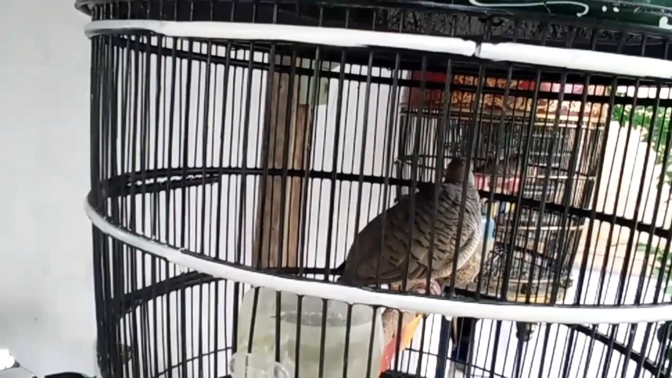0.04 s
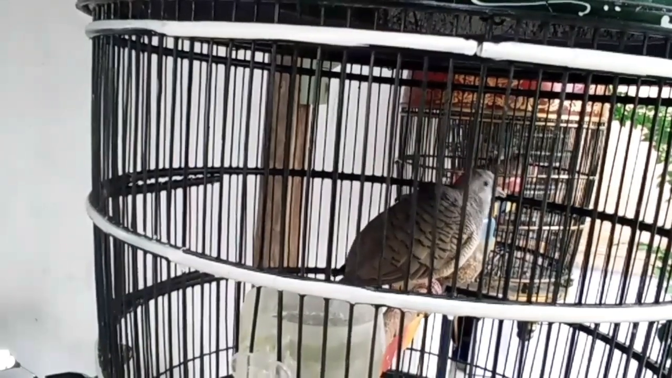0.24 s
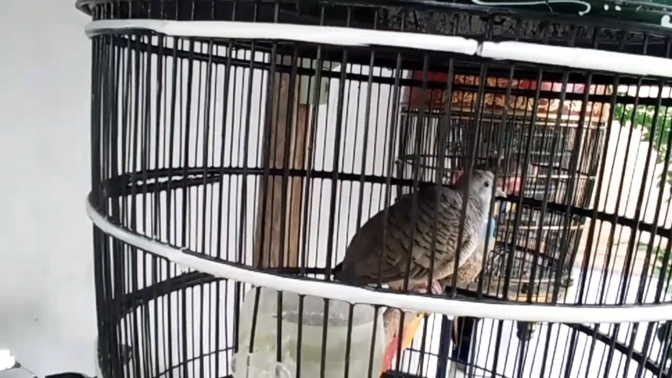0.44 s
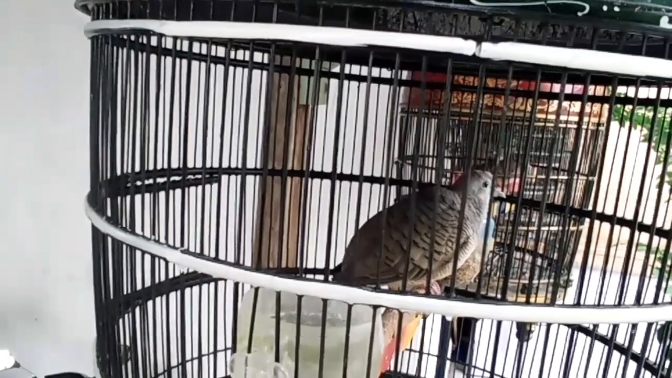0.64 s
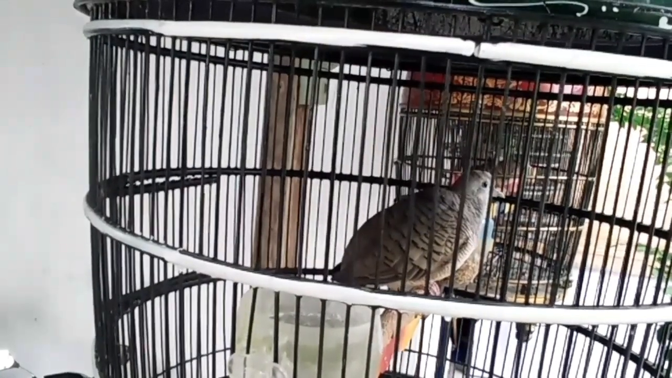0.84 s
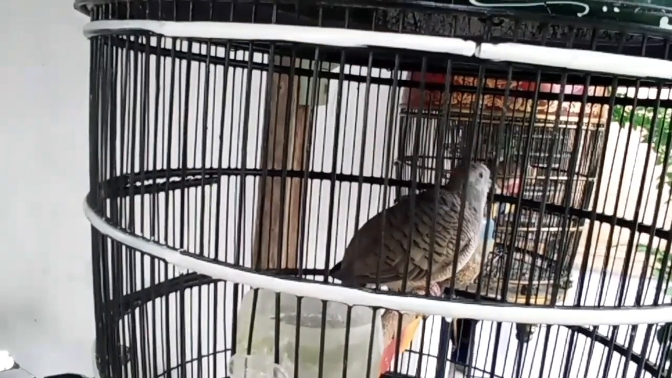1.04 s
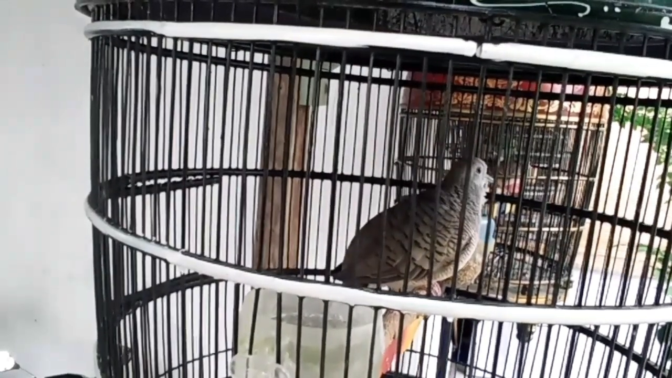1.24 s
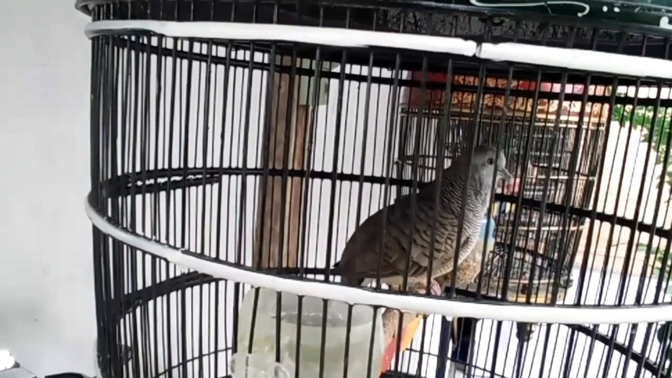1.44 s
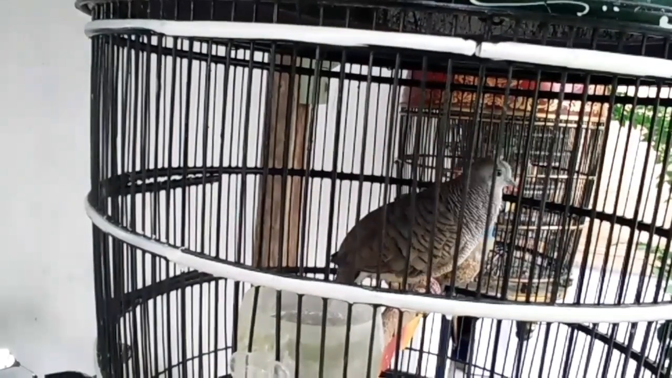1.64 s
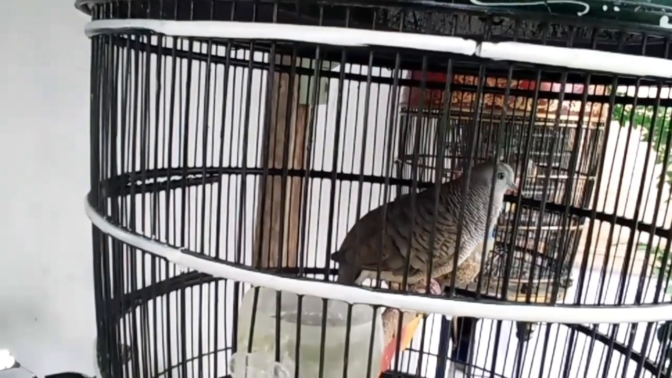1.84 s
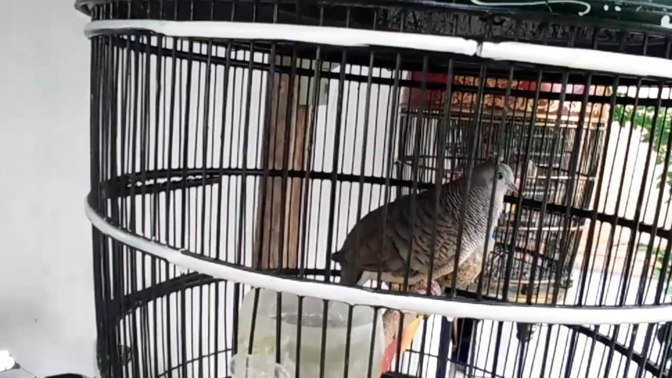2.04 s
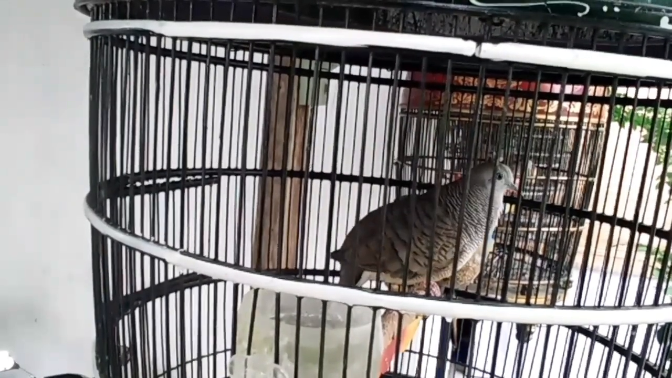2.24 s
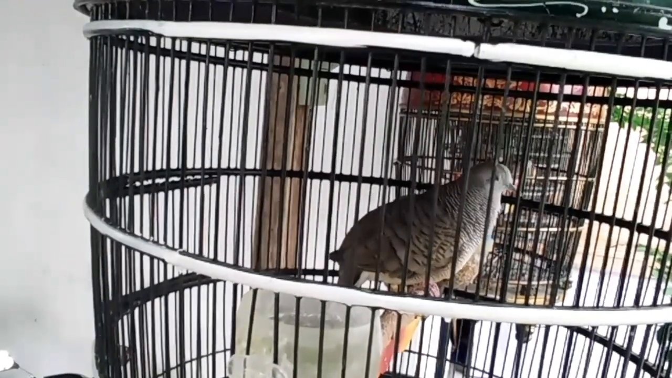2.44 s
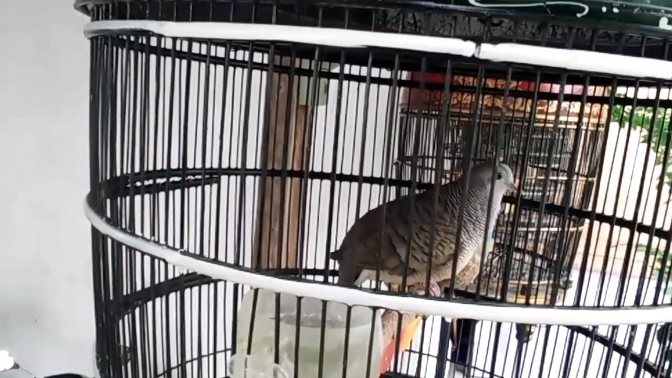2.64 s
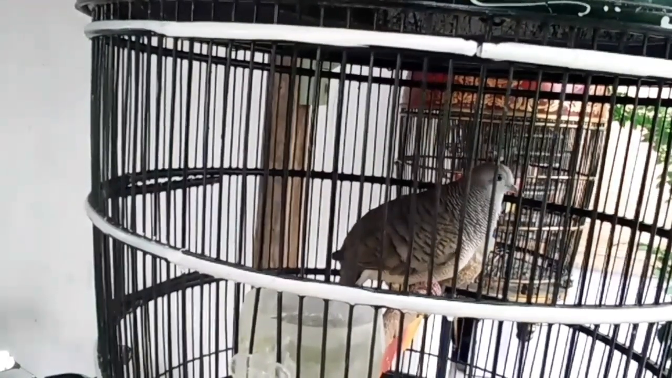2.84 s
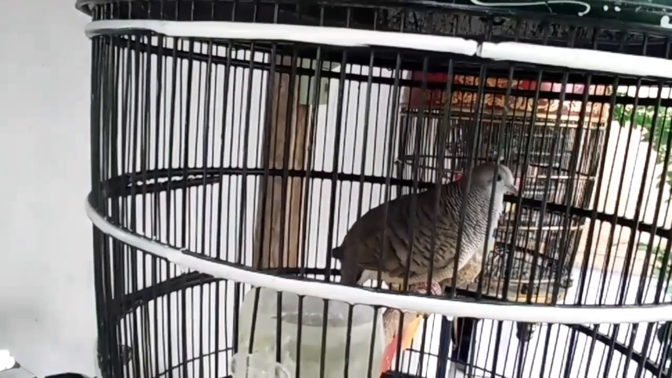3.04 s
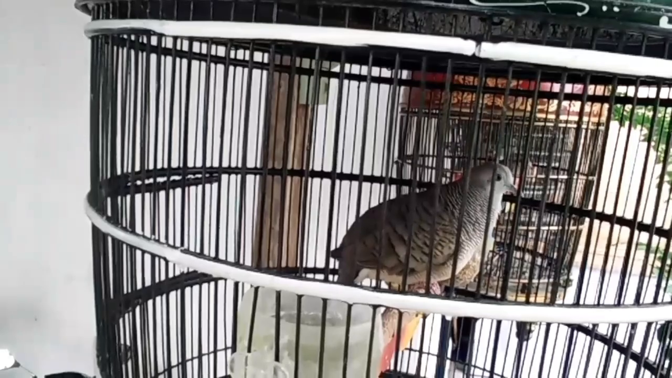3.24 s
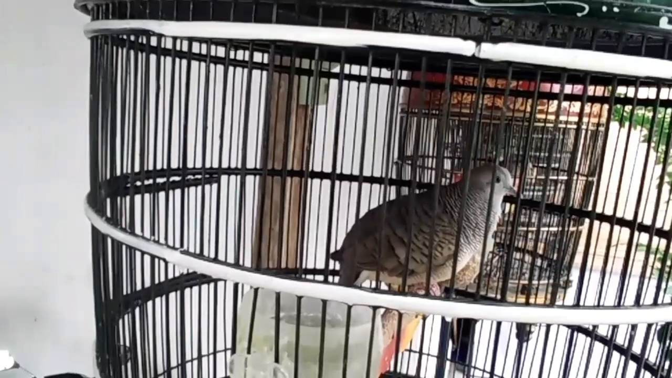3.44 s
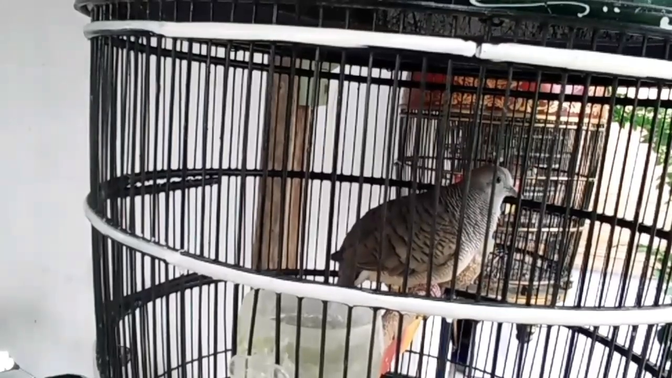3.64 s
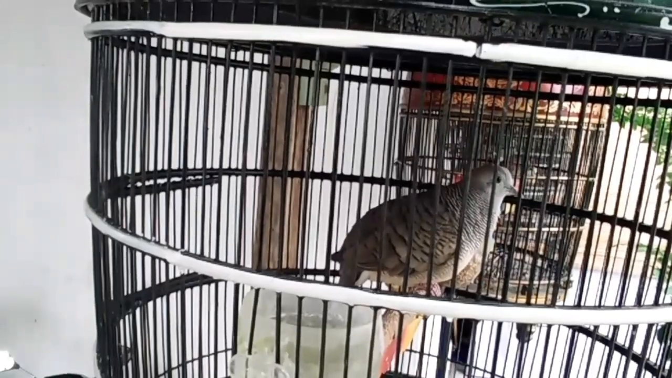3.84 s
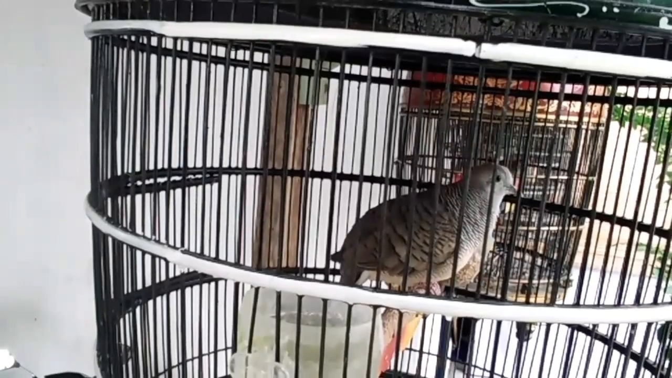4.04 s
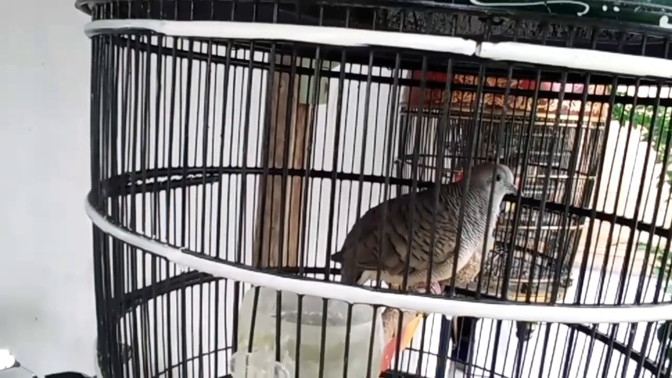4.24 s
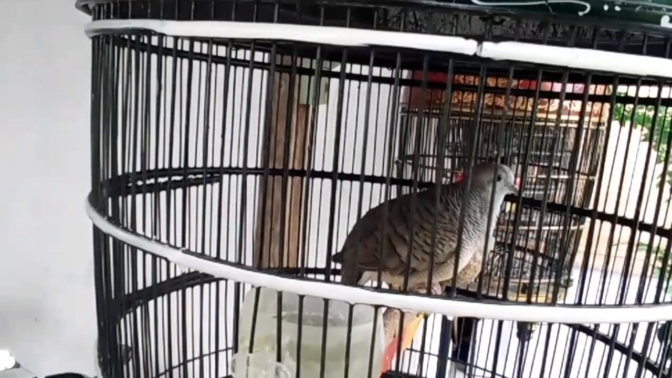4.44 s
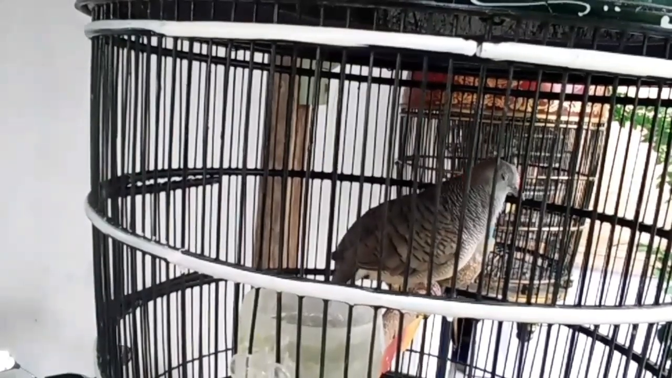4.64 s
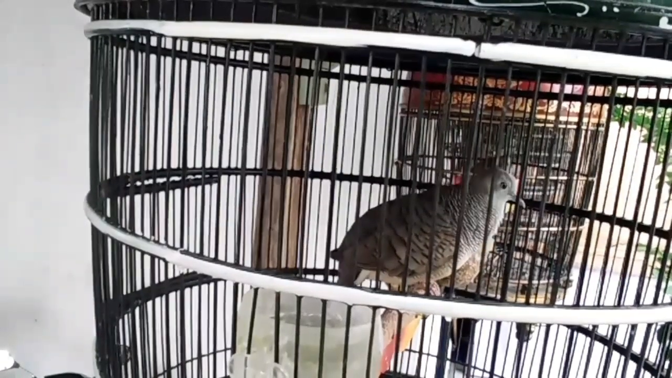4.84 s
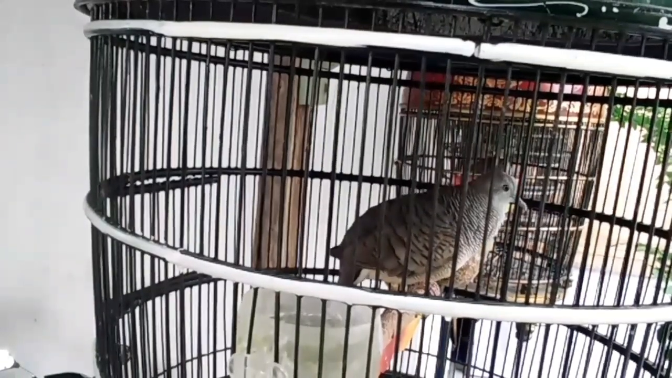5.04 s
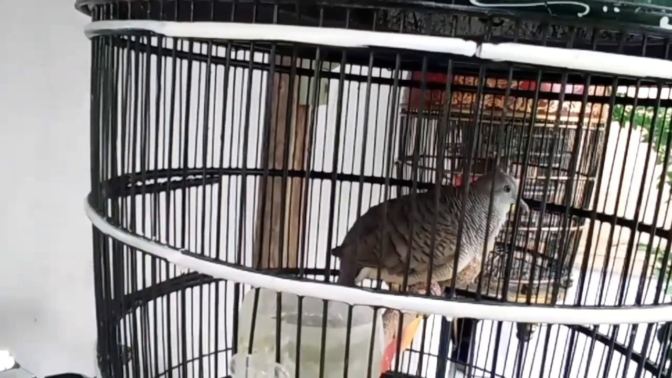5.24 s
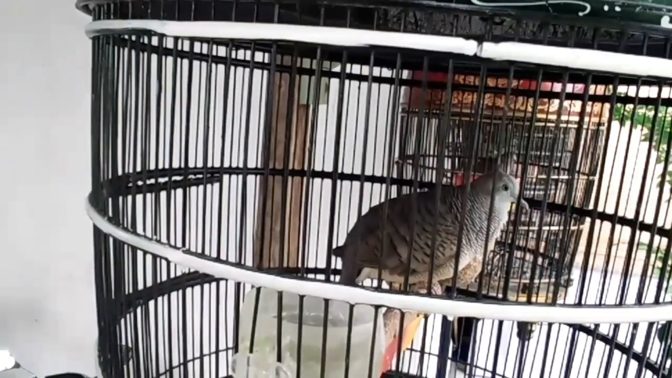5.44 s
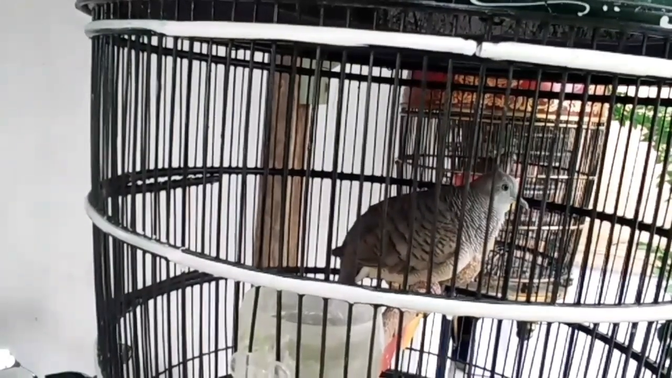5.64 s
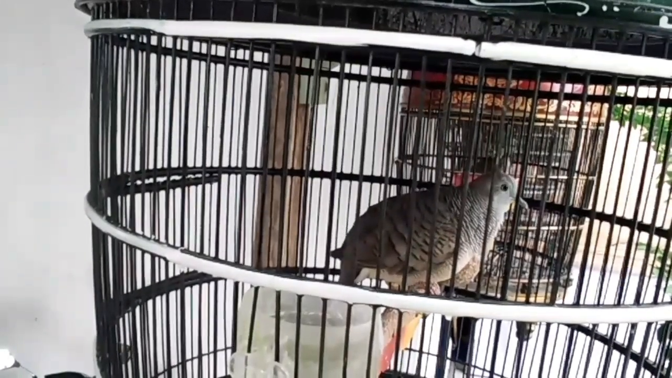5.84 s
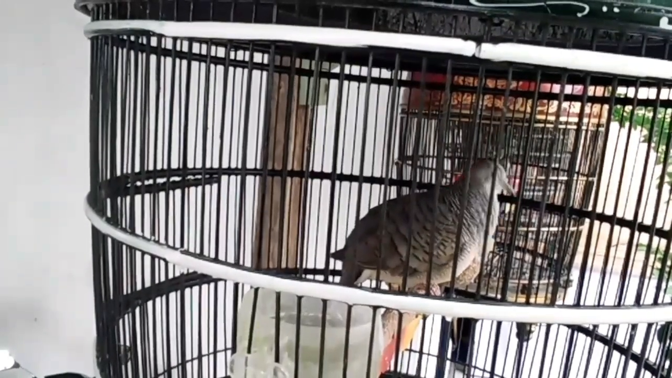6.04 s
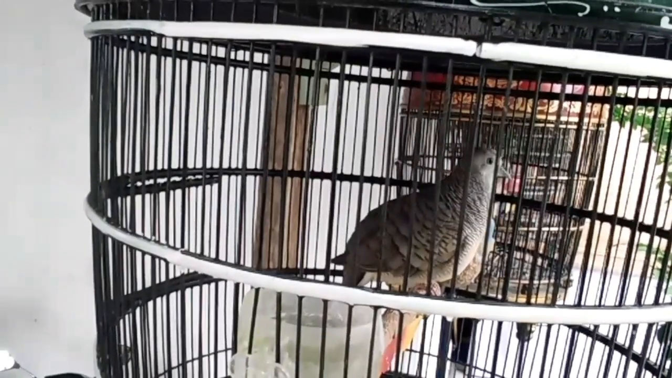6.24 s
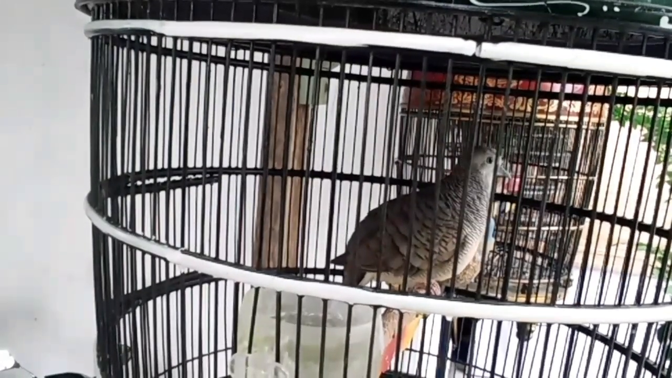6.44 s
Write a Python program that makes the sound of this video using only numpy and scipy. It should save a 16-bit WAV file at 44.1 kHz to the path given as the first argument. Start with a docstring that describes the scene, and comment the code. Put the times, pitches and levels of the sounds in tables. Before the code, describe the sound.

Close microphone on a caged dove, on an outdoor porch. Mellow, hollow, almost whistled coos start slightly hoarse, scoop upward, hold and sag. A first phrase of eleven coos slows into evenly spaced pulses; a second, shorter and slightly softer, follows after a gap. Behind are another dove's quieter, slightly higher repeated notes, reverberant far birds, a thin falling chirp and soft outdoor air.

```python
"""Zebra dove cooing on a porch

A caged zebra dove coos two phrases close by, on a porch whose walls throw each note back.
Every coo is a sum of harmonics that scoops up into the throat's resonance, holds and sags.
Another dove's even run, distant calls and a falling chirp are gliding tones, mostly reverberated;
dry swishes, a hush, a low rumble and the wash of the furthest birds are filtered noise.
"""
import sys
import numpy as np
from scipy import signal
from scipy.fft import rfft, irfft
from scipy.io import wavfile
from scipy.ndimage import uniform_filter1d

SR = 44100
rng = np.random.default_rng(int(sys.argv[2]) if len(sys.argv) > 2 else 0)


def wrap_up_sound(samples):
    """Save the sound to the file named by the first command line argument, as 16-bit audio."""
    columns = np.atleast_2d(samples).T
    # keep every value between -1 and 1, then stretch to whole-number steps
    tamed = np.clip(columns, -1, 1)
    steps = np.round(tamed * 32767).astype(np.int16)
    wavfile.write(sys.argv[1], SR, steps)


N = 286870

# The near dove's coos: (start [s], end [s], top pitch [Hz], drive level [dB], length of the upward scoop [s],
# sag of the level [dB], lift of the upper partials [dB])
NEAR_COOS = [(1.732, 1.799, 1208, -19, .05, -0.5, 3), (1.818, 1.854, 1169, -23.5, .014, -.5, 6.5),
             (1.941, 1.973, 1163, -22.5, 0.029, 6, 0), (2.058, 2.169, 1205, -20, .024, 3.5, 2),
             (2.305, 2.424, 1202, -20.5, 0.03, 4, 0.5), (2.563, 2.687, 1199, -22, .027, 2.5, -2),
             (2.835, 2.966, 1197, -21.5, .025, 3.5, -1.5), (3.124, 3.255, 1198, -22, .026, 2.5, -5),
             (3.413, 3.548, 1190, -23, 0.029, 2.5, -3), (4.844, 4.921, 1196, -21.5, .036, 0, -2.5),
             (4.926, 4.967, 1163, -26.5, .010, -2, 7), (5.051, 5.083, 1147, -23.5, 0.018, 2.5, 0.5),
             (5.163, 5.278, 1182, -25, .028, -1.5, 5), (5.419, 5.534, 1186, -25, 0.034, .5, -5.5)]
# Air rushing with the tone: (frequency [Hz], relative density [dB per Hz])
AIR_SPECTRUM = [(100, 2.5), (600, 0.5), (1700, -1), (2600, -8.5), (3300, -14.5), (4600, -19.5),
                (6500, -11.5), (9000, -8.5), (14000, -17.5)]


def dove(air_db=-53, uneven_db=3.0):
    """Turbulence: the near dove's coos carry an uneven trace of rushing air that follows their loudness."""
    coos = np.zeros(N)
    for row in NEAR_COOS:
        add(coos, *coo(*row))
    loudness = np.sqrt(abs(uniform_filter1d(coos ** 2, size=400)))
    unevenness = gain_of(air_db + uneven_db * wander(7.2))
    return coos + unevenness * loudness * noise(AIR_SPECTRUM)


# The scoop into a coo, with a break between a low and a high register:
# (share of the scoop [0-1], pitch as a share of the top [ratio], drive [dB])
SCOOP_SHAPE = [(0, .44, -32), (.25, .49, -19), (.5, .51, -16), (.62, .52, -22), (.68, .765, -15),
               (.82, .79, -7), (1, .82, -.5)]
# The held part: (share of the note [0-1], pitch as a share of the top [ratio], share of the level's sag [ratio])
HOLD_SHAPE = [(.05, .968, .7), (.17, .993, .45), (.32, 1, -.1), (.55, .999, -.05), (.68, .99, .5),
              (.81, .973, 1.3), (.93, .953, 1.1)]
# Resonance of the swollen throat: (frequency [Hz], gain [dB])
THROAT_RESONANCE = [(400, -30), (600, -22.5), (780, -12.5), (930, -3), (1200, 0.5), (1275, -3), (1380, -28),
                    (1800, -44), (2350, -52.5), (3000, -81), (3600, -81.5), (4750, -77), (5900, -59.5),
                    (7100, -53.5), (8300, -75.5), (10500, -77.5), (11900, -65), (13500, -78.5)]
FULL_ARCH_S = .11  # a coo shorter than this arches less in pitch


def coo(start, end, top_hz, db, scoop_s, sag_db, press_db, release_s=0.0072,
        end_pitch=0.9174, last_pitch=.84, jitter=0.0015, flicker_db=4):
    """Source and filter: as the syrinx glides up, the throat passes its second harmonic, then its fundamental."""
    t = np.arange(start - scoop_s, end + release_s, 1 / SR)
    early, early_pitch, early_db = np.transpose(SCOOP_SHAPE)
    late, late_pitch, sag = np.transpose(HOLD_SHAPE)
    scoop_times = start + (early - 1) * scoop_s
    hold_times = start + late * (end - start)
    knots = np.sort(np.r_[scoop_times, hold_times, end, end + release_s])

    arch = min((end - start) / FULL_ARCH_S, 1)
    held_pitch = 1 - (1 - np.r_[late_pitch, end_pitch]) * arch
    pitch = np.interp(t, knots, np.r_[early_pitch, held_pitch, last_pitch])
    if scoop_s < .017:
        pitch = np.maximum(pitch, .88)  # a coo slurred onto the last one stays in the high register
    shake, flicker = rng.standard_normal((2, SR))
    unsteadiness = 1 + jitter * evened(uniform_filter1d(shake, size=90))[:len(t)]
    hz = top_hz * uniform_filter1d(pitch, size=90) * unsteadiness
    phase = 2 * np.pi * np.cumsum(hz) / SR

    drive_db = np.interp(t, knots, np.r_[early_db, -sag * sag_db, -sag_db - 3.5, -36])
    drive = gain_of(db + uniform_filter1d(drive_db, size=90)) * signal.windows.tukey(len(t), .04)
    partials = [gain_of(read(THROAT_RESONANCE, k * hz)) * np.cos(k * phase) for k in range(1, 12)]

    # the faint upper partials flicker with how firmly the membranes close, and weaken outside the held part
    firmness = gain_of(press_db + flicker_db * evened(uniform_filter1d(flicker, size=1500))[:len(t)])
    firmness = firmness * np.clip(np.minimum(t - start, end - t) / 0.009 + 0.35, .2, 1)
    return t[0], np.sqrt(2) * drive * (sum(partials[:2]) + firmness * sum(partials[2:]))


# The hoarse start of a coo: (frequency [Hz], relative density [dB per Hz])
RASP_SPECTRUM = [(300, -21), (600, 1), (1400, 2.5), (2000, -12.5), (3000, -32), (8000, -42.5)]


def rasp(rasp_db=-35):
    """Amplitude-shaped noise: each coo starts hoarse, until the scoop settles into the clear tone."""
    swell = np.zeros(N)
    for start, _, _, db, scoop_s, _, _ in NEAR_COOS:
        window = signal.windows.tukey(round(scoop_s * SR), .5)
        add(swell, start - scoop_s, gain_of(db + rasp_db) * window)
    return swell * noise(RASP_SPECTRUM)


# Wall echoes: (delay [s], level before the porch's colouring [dB])
WALL_ECHOES = [(0.0131, -17.5), (0.0285, -19), (.0365, -16.5), (.052, -18.5)]
# Colour of the returned sound, which booms just under the coos' pitch: (frequency [Hz], gain [dB])
PORCH_RESONANCE = [(400, 1), (700, 0.5), (830, 2.5), (915, 15.5), (955, 9.5), (1020, -3), (1200, 2.5),
                   (1400, 2.5), (1800, 7.5), (3000, -1.5), (8000, 4.5)]


def porch(x, wet_db=-19):
    """Early reflection: wall echoes and a short diffuse tail, in the porch's colour, join the direct sound."""
    thrown = gain_of(wet_db) * reverb(x, stretch=0.92, build_s=0.038)
    for delay, db in WALL_ECHOES:
        add(thrown, delay, gain_of(db) * x)
    return x + coloured(thrown, PORCH_RESONANCE)


def neighbour(wet_db=-8, overtones_db=-1, bend=.01):
    """Directivity: a second dove a few cages away is turned aside, so its overtones arrive mainly as echo."""
    leans = rng.standard_normal(20)
    notes = [sliding([note], bend * lean)[0] for note, lean in zip(neighbour_run(), leans)]
    tone = whistles(notes, arch=.05, waver=.012, flutter_db=2, second_db=-27, third_db=-25)
    low = coloured(tone, [(1700, 0), (2100, -40)])  # keeps the fundamental
    grainy = (tone - low) * evened(1 + wander(130))
    overtones = reverb(grainy, stretch=2.6, build_s=.003) * evened(gain_of(2 * wander(6)))
    echo = gain_of(wet_db) * reverb(low, stretch=1.7, build_s=0.0079)
    return low + echo + gain_of(overtones_db) * overtones


# The run swells and fades while its pitch sinks: (time [s], pitch [Hz], level before echo [dB])
RUN_CONTOUR = [(3.79, 1361, -52), (4.0, 1311, -52.5), (4.3, 1317, -46.5), (5.07, 1314, -49.5),
               (5.75, 1256, -58)]
RUN_START_S, RUN_NOTE_S, RUN_PACE_S = 3.79, .095, .228
RUN_HURRY_S, RUN_SETTLE_NOTES = .04, 2.1  # shortening of the first gap; notes over which it dies away


def neighbour_run(count=10):
    """Exponential relaxation: even notes (start, length, pitch, level) start hurried and settle to their pace."""
    gaps = RUN_PACE_S - RUN_HURRY_S * np.exp(-np.arange(count - 1) / RUN_SETTLE_NOTES)
    starts = RUN_START_S + np.r_[0, np.cumsum(gaps)]
    s, hz, db = np.transpose(RUN_CONTOUR)
    return [(at, RUN_NOTE_S, np.interp(at, s, hz), np.interp(at, s, db)) for at in starts]


# Doves across the yard: (start [s], length [s], mid pitch [Hz], level before distance [dB])
YARD_COOS = [(0, 0.078, 990, -57.5), (.12, 0.14, 1007, -68), (1.025, 0.087, 1021, -45.5),
             (1.08, 0.092, 1270, -49), (1.2, 0.1, 1153, -45.5), (1.23, .24, 1075, -47.5),
             (1.47, 0.32, 1123, -50), (3.62, 0.231, 1210, -63.5), (4.56, .1, 1169, -55.5),
             (4.765, 0.042, 1134, -49), (5.66, .11, 1029, -53.5), (5.98, .08, 1155, -51.5),
             (6.06, 0.085, 1196, -51), (6.345, 0.088, 1085, -45.5), (6.39, 0.098, 1183, -49)]
# Hoarse, higher calls of other cage birds: (start [s], length [s], mid pitch [Hz], level before distance [dB])
YARD_CALLS = [(1.05, 0.084, 1850, -62.5), (1.14, 0.2, 1716, -61), (1.37, 0.14, 1690, -59),
              (1.38, 0.11, 2074, -68), (1.55, .6, 1675, -59), (2.22, 0.11, 2160, -61),
              (2.92, 0.097, 2128, -66.5), (3.19, .09, 3700, -70.5), (3.76, 0.1, 1736, -65.5),
              (5.54, .1, 1790, -66), (6.22, .2, 1900, -66), (6.38, .1, 1650, -65.5)]
# Soft, low hoots from much further off: (start [s], length [s], mid pitch [Hz], level before distance [dB])
DISTANT_HOOTS = [(.91, 0.089, 649, -75), (1.0, .2, 380, -81), (1.55, 0.12, 398.3, -76),
                 (2.72, 0.21, 397, -78), (4.16, 0.18, 444, -79), (5.69, 0.17, 713, -74)]
COO_SLIDE, CALL_SLIDE = 0.044, -0.038  # change of pitch over a far note, as a share


def far_birds(direct_db=-11, wet_db=-2, hoarse_db=-4):
    """Direct-to-reverberant ratio: distant calls, some hoarse, arrive mostly as reverberation."""
    calls = YARD_CALLS + stray_notes(low_hz=1900, high_hz=3770, db=-82, length_s=.1, count=6)
    coos = whistles(sliding(YARD_COOS, COO_SLIDE), arch=.05, waver=.024,
                    flutter_db=2.5, second_db=-42, third_db=-54)
    cries = whistles(sliding(calls, CALL_SLIDE), arch=.03, waver=.025,
                     flutter_db=3, second_db=-42, third_db=-54)
    hoots = whistles(sliding(DISTANT_HOOTS, COO_SLIDE), arch=.07, waver=.06,
                     flutter_db=3, second_db=-42, third_db=-54)
    hoarseness = evened(1 + gain_of(hoarse_db) * wander(220))
    dry = coos + hoots + cries * hoarseness
    return gain_of(direct_db) * dry + gain_of(wet_db) * reverb(dry, stretch=0.94, build_s=0.019)


def stray_notes(low_hz, high_hz, db, length_s, count):
    """Stratified chance: one faint note at random in each equal slice of the scene, pitched on a log scale."""
    slice_s = N / SR / count
    return [((k + when) * slice_s, length_s * (.5 + long), low_hz * (high_hz / low_hz) ** high, db)
            for k, (when, long, high) in enumerate(rng.random((count, 3)))]


# A small bird's falling chirp: (time [s], pitch [Hz], level before distance [dB])
CHIRP_CONTOUR = [(1.58, 6750, -74), (1.6, 6530, -61.5), (1.625, 5350, -71.5), (1.67, 5020, -59),
                 (1.731, 4270, -71)]


def chirp(waver=.025, direct_db=-10, wet_db=0):
    """Frequency modulation and reverberation: one thin note slides down and lingers in the yard."""
    s, hz, db = np.transpose(CHIRP_CONTOUR)
    t, dry = np.arange(s[0], s[-1], 1 / SR), np.zeros(N)
    pitch = np.interp(t, s, hz) * (1 + waver * wander(300)[:len(t)])
    tone = np.sin(2 * np.pi * np.cumsum(pitch) / SR)
    add(dry, s[0], gain_of(np.interp(t, s, db)) * signal.windows.tukey(len(t), .1) * tone)
    return gain_of(direct_db) * dry + gain_of(wet_db) * reverb(dry, stretch=3.5, build_s=.006)


# Dry strokes, like brushed feathers: (start [s], rise [s], hold [s], level [dB], weight of the low part [dB])
SWISH_STROKES = [(0.364, 0.032, 0.039, -58.5, 0.5), (0.648, 0.033, 0.03, -56, 1.5),
                 (1.707, 0.038, 0.049, -74, -13), (2.011, 0.031, 0.1, -61.5, -11),
                 (2.931, 0.024, 0.051, -79.5, -5)]
# Colour of the friction: (frequency [Hz], relative density [dB per Hz])
SWISH_SPECTRUM = [(500, -32.5), (900, -9.5), (1180, -6.5), (1500, -11.5), (2200, -7), (2600, -8.5),
                  (2790, -4.5), (3020, -12.5), (3500, -6), (4100, -1), (5000, -7.5), (5600, -8),
                  (6300, -19.5), (9500, -25.5), (14000, -35)]


def swishes(fade_s=0.017, wet_db=-7):
    """Friction noise: brief bursts whose five frequency bands rustle on their own."""
    t, dry = np.arange(N) / SR, np.zeros(N)
    hiss = rfft(noise(SWISH_SPECTRUM))
    band = np.digitize(np.fft.rfftfreq(N, 1 / SR), [2000, 3200, 4400, 6000])
    bands = [irfft(hiss * (band == k), N) * evened(gain_of(3.2 * wander(130))) for k in range(5)]
    low, high = sum(bands[:2]), sum(bands[2:])
    for start, rise, hold, db, low_db in SWISH_STROKES:
        attack = np.clip((t - start) / rise, 0, 1) ** 2
        fade = np.exp(-np.maximum(t - start - rise - hold, 0) / fade_s)
        dry += gain_of(db) * attack * fade * (gain_of(low_db) * low + high)
    return dry + gain_of(wet_db) * reverb(dry, stretch=1.7, build_s=0.0082)


# Colour of the outdoor hush: (frequency [Hz], relative density [dB per Hz])
HUSH_SPECTRUM = [(200, -31), (500, -2.5), (700, 2), (1050, 0), (1400, -2.5), (2100, -7), (3000, -16.5),
                 (6000, -20.5), (10000, -22.5), (14000, -17.5)]
# Colour of the low rumble: (frequency [Hz], relative density [dB per Hz])
RUMBLE_SPECTRUM = [(15, -35), (28, -13), (38, -5), (52, 2.5), (125, 2), (160, 1.5), (230, -7), (300, 2),
                   (370, -12), (450, -8), (700, -14), (1500, -38.5)]
# Course of the rumble: (time [s], level [dB])
RUMBLE_LEVEL = [(0.0, -74.5), (0.85, -76), (2.03, -72), (4.65, -73.5), (4.67, -68), (5.79, -74),
                (5.85, -69), (6.48, -76), (6.5, -81)]
# Colour of the blended calls of the furthest birds: (frequency [Hz], relative density [dB per Hz])
CHORUS_SPECTRUM = [(300, -51.5), (650, -15), (850, -5.5), (1030, 3.5), (1220, 9.5), (1400, -13),
                   (1750, -20.5), (2150, -31), (2800, -31), (6000, -59)]
# Course of those blended calls, before their random swelling: (time [s], level [dB])
CHORUS_LEVEL = [(0, -69.5), (.55, -96), (1.0, -83), (1.1, -56), (2.4, -63), (4.4, -69), (5.0, -59),
                (5.7, -58), (6.2, -74.5), (6.5, -60)]


def outdoors(hush_db=-76, lumpy_db=3, swell_db=2.5, patch_db=2.5):
    """Modulated noise: a patchy hush, a lumpy low rumble and the wash of the furthest birds."""
    t = np.arange(N) / SR
    hush = gain_of(hush_db) * patchy(noise(HUSH_SPECTRUM), patch_db)
    lumps = evened(noise(RUMBLE_SPECTRUM) * gain_of(lumpy_db * wander(35)))
    rumble = gain_of(np.interp(t, *np.transpose(RUMBLE_LEVEL))) * lumps
    chorus_db = np.interp(t, *np.transpose(CHORUS_LEVEL)) + swell_db * wander(14)
    chorus = gain_of(chorus_db) * patchy(noise(CHORUS_SPECTRUM), patch_db)
    return hush + rumble + chorus


def patchy(x, patch_db, size=5):
    """Time-frequency modulation: patches of a noise swell and sink on their own, less so in the treble."""
    hz, _, z = signal.stft(x, SR, nperseg=2048)
    patches = uniform_filter1d(rng.standard_normal(z.shape), size, 0)
    patches = evened(uniform_filter1d(patches, size, 1))
    depth = np.interp(hz, [2000, 6000], [1, .25])[:, None]
    return evened(signal.istft(z * gain_of(patch_db * depth * patches), SR, nperseg=2048)[1][:N])


def whistles(notes, arch, waver, flutter_db, second_db, third_db):
    """Harmonic synthesis: arched notes of unsteady pitch and loudness carry two weak overtones."""
    out, unsteady = np.zeros(N), 1 + waver * wander(140)
    for start, end, first_hz, last_hz, db in notes:
        u = np.linspace(0, 1, max(round((end - start) * SR), 200))
        bend = np.roll(unsteady, -round(start * SR))[:len(u)]
        glide = first_hz + (last_hz - first_hz) * u
        hz = glide * (1 - arch * (2 * u - 1) ** 6) * bend / bend.mean()
        phase = 2 * np.pi * np.cumsum(hz) / SR
        tone = np.sin(phase) + gain_of(second_db) * np.sin(2 * phase) + gain_of(third_db) * np.sin(3 * phase)
        add(out, start, np.sqrt(2) * gain_of(db) * tone * signal.windows.tukey(len(u), .45))
    return out * evened(gain_of(flutter_db * wander(40)))


def sliding(notes, slide):
    """Linear glide: notes (start, length, pitch, level) become (start, end, first Hz, last Hz, level)."""
    return [(s, s + length, hz * (1 - slide / 2), hz * (1 + slide / 2), db) for s, length, hz, db in notes]


# Decay of the diffuse sound, before each use stretches it: (frequency [Hz], time to fall by 60 dB [s])
DECAY_TIMES = [(300, 0.77), (1200, 0.36), (3500, 0.14), (10000, 0.13)]


def reverb(x, stretch, build_s):
    """Diffuse decay: a noise tail, of rms gain 1 from 900 to 1400 Hz, builds up, then dies band by band."""
    hz, t, z = signal.stft(rng.standard_normal(SR), SR, nperseg=256)
    decay = gain_of(-60 * t / (stretch * read(DECAY_TIMES, hz)[:, None]))
    build = 1 - np.exp(-(t / build_s) ** 2)
    tail = signal.istft(z * decay * build, SR, nperseg=256)[1]
    response = abs(rfft(tail, SR))[900:1400]  # one bin per Hz
    return signal.fftconvolve(x, tail)[:N] / np.sqrt(np.mean(response ** 2))


def noise(spectrum):
    """Filtered white noise: a steady hiss of a given colour, rms 1."""
    return evened(coloured(rng.standard_normal(N), spectrum))


def coloured(x, spectrum):
    """Linear filtering: each frequency of x is scaled by a spectrum in dB."""
    return irfft(rfft(x) * gain_of(read(spectrum, np.fft.rfftfreq(N, 1 / SR))), N)


def wander(per_s):
    """Band-limited chance: Gaussian low-passed noise of rms 1, changing about per_s times a second."""
    lowpass = np.exp(-(np.fft.rfftfreq(N, 1 / SR) / per_s) ** 2)
    return evened(irfft(rfft(rng.standard_normal(N)) * lowpass, N))


def read(points, hz):
    """Logarithmic frequency axis: interpolates a table of values over log frequency."""
    f, value = np.transpose(points)
    return np.interp(np.log(hz + 1), np.log(f + 1), value)


def gain_of(db):
    """Decibel law: converts a level to an amplitude."""
    return 10 ** (np.asarray(db) / 20)


def evened(x):
    """Power normalisation: scales to rms 1."""
    return x / np.sqrt(np.mean(x ** 2) + 1e-20)


def add(mix, s, sound):
    """Superposition: adds a sound into the mix, in place, at time s."""
    part = mix[max(round(s * SR), 0):][:len(sound)]
    part += sound[:len(part)]


def scene():
    """Superposition: the near dove on its porch, with the yard behind it."""
    near = porch(dove() + rasp())
    yard = neighbour() + far_birds() + chirp() + swishes() + outdoors()
    return (near + yard)[None]


EDGE_HZ = 14300


def record(dry):
    """Band limiting: a linear-phase low-pass removes what lies above the edge frequency."""
    lowpass = signal.firwin(511, EDGE_HZ, window=("kaiser", 9), fs=SR)
    return signal.oaconvolve(dry, lowpass[None], "same")


dry = scene()
out = record(dry)
wrap_up_sound(out)
```